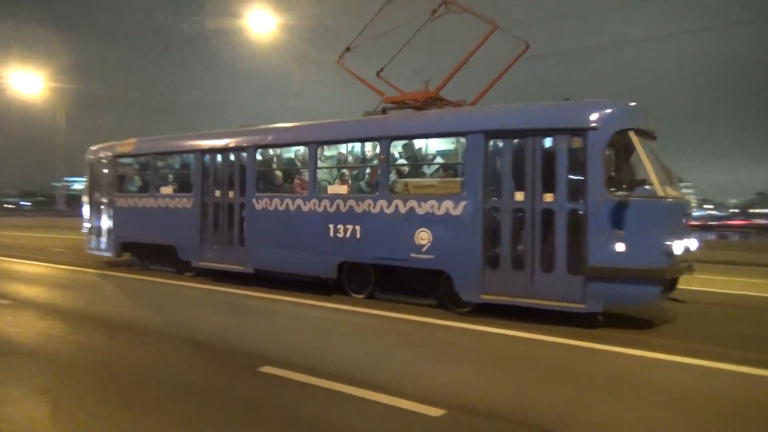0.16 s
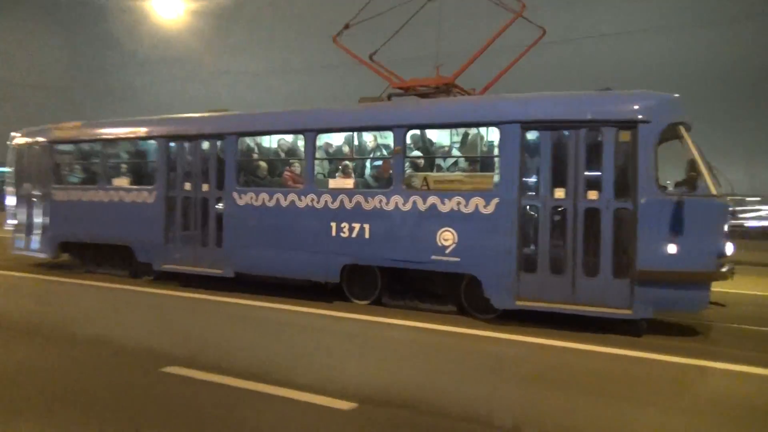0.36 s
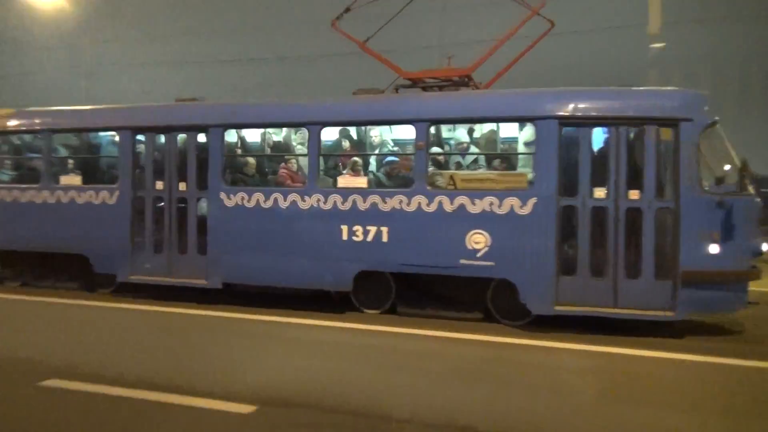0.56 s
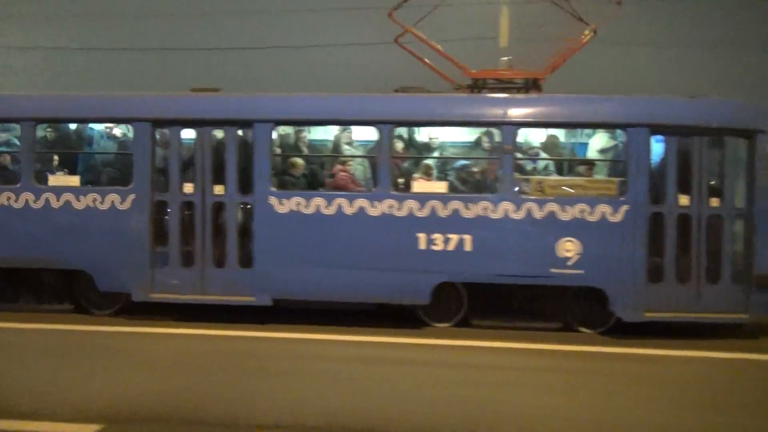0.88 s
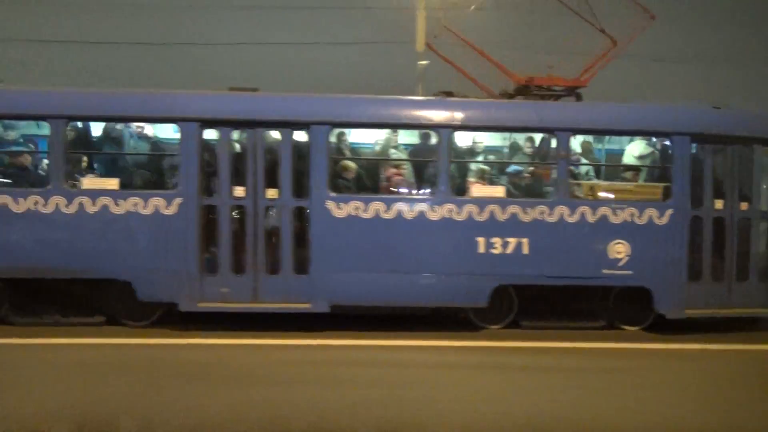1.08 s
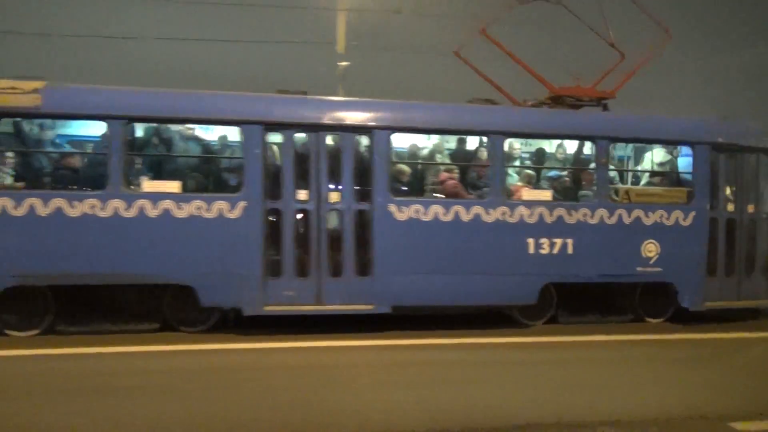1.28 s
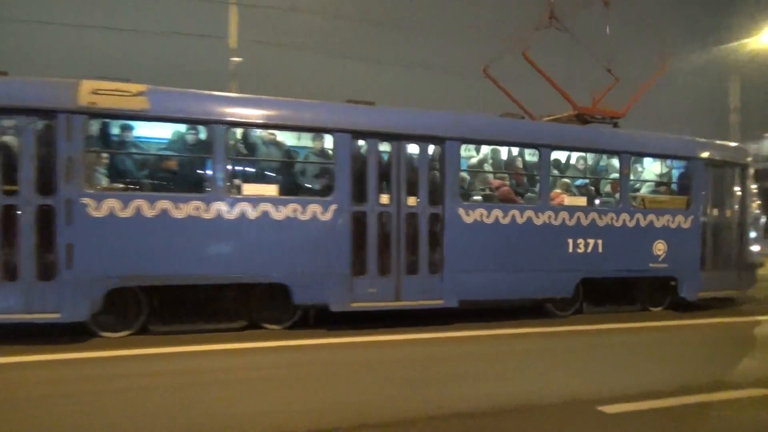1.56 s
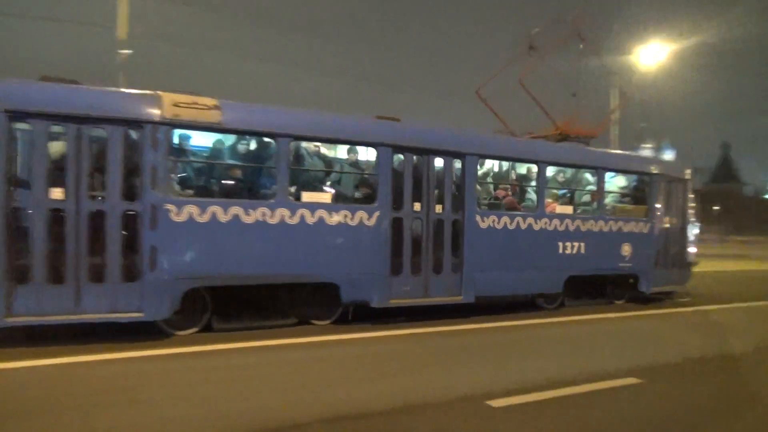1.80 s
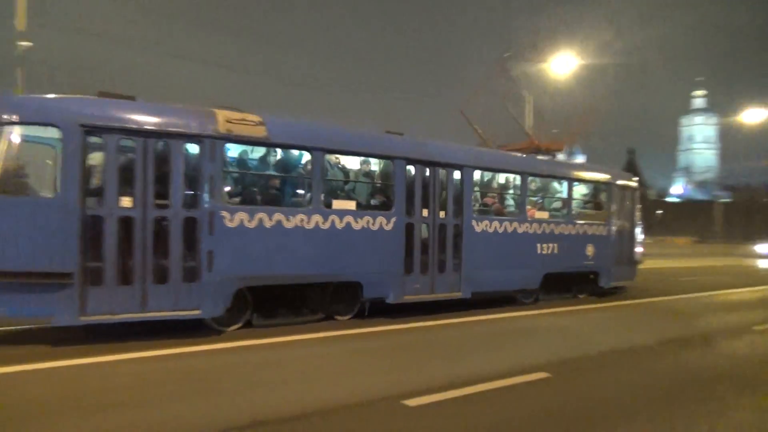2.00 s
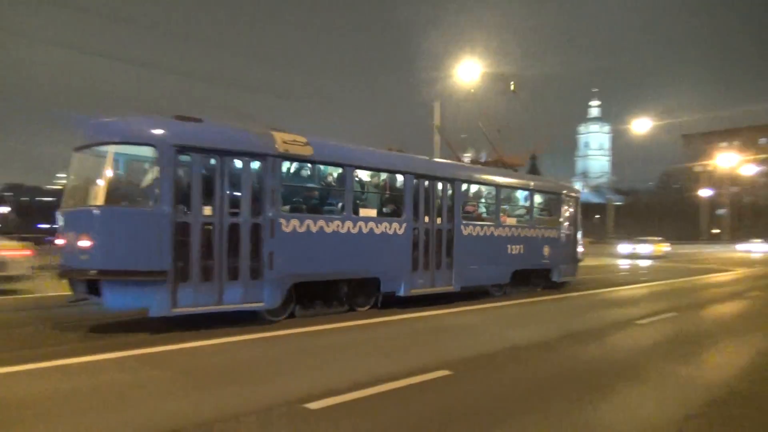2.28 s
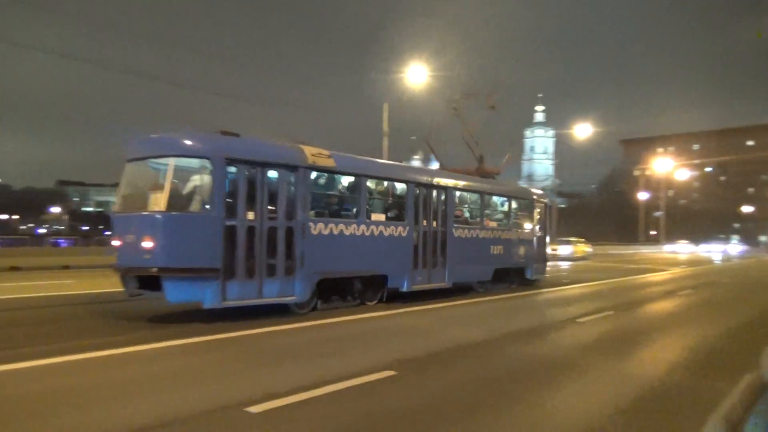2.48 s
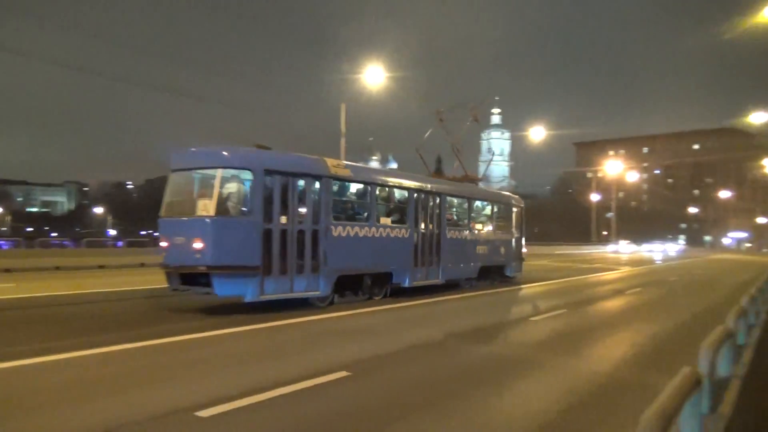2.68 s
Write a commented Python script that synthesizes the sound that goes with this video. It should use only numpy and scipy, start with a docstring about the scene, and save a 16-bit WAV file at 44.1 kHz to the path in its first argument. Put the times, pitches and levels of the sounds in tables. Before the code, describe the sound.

A tram is already close at 0 s, its body droning with an unsteady low motor hum and deep rumble. Wheels roar and clack softly under a fine sizzle, while loose metal rattles and taps. Pitch sinks fastest near 1 s. Small clinks ring at 1.6 and 2.4 s. Treble fades, traffic wash rises, and car tyres emerge left from about 2.4 s. Open roadside, stereo, peaks held down.

```python
"""A tram rolls past on a wide road at night. From the start its body drones over a hum and a deep rumble,
wheels roar and clack softly, loose metal rattles and taps close by, and traffic washes behind, rising.
Drone, hum, rumble and rolling treble sink in pitch, fastest near 1 s; a clink rings at 1.6 s, another at
2.4 s, as a car's tyres emerge on the left. Noise is shaped by spectra; hum, clinks and clack rings are
sines. The recorder's limiter holds the peaks down."""
import sys
import numpy as np
from scipy import signal
from scipy.fft import rfft, irfft, next_fast_len
from scipy.io import wavfile
from scipy.ndimage import uniform_filter1d, minimum_filter1d, map_coordinates

SR = 44100
rng = np.random.default_rng(int(sys.argv[2]) if len(sys.argv) > 2 else 0)


def transcribe(signal):
    """Save signal, clipped to [-1, 1], as a 16-bit WAV file at the path in sys.argv[1]."""
    frames = np.atleast_2d(signal).T
    limited = np.clip(frames, -1, 1)
    pcm = np.round(limited * 32767).astype(np.int16)
    wavfile.write(sys.argv[1], SR, pcm)


N = 125685


def amp(db):
    """Decibels to gain."""
    return 10 ** (np.asarray(db) / 20)


def unit(x):
    """Scaled to rms 1."""
    return x / np.sqrt(np.mean(x ** 2) + 1e-20)


def clock():
    """Time of each sample in s."""
    return np.arange(N) / SR


def curves(rows):
    """One value per sample for each column after the time."""
    s, *cols = np.transpose(rows)
    return [np.interp(clock(), s, c) for c in cols]


def wobble(knots_per_s):
    """Smooth random curve through normally distributed knots."""
    return map_coordinates(rng.standard_normal(1024), [clock() * knots_per_s], mode="wrap")


def filtered(x, response):
    """x times a response of frequency."""
    m = next_fast_len(x.shape[-1] + 8192)
    spectrum = rfft(x, m) * response(np.fft.rfftfreq(m, 1 / SR))
    return irfft(spectrum, m)[..., :x.shape[-1]]


def coloured(x, colour):
    """x through a minimum-phase filter with an (f/Hz, level/dB) spectrum, at rms 1."""
    f, db = np.transpose(colour)

    def response(hz):
        """Folding the cepstrum makes the filter causal."""
        level_db = np.interp(np.log(hz + 1), np.log(f), db)
        cepstrum = irfft(np.log(amp(level_db)))
        causal_half = 2 * cepstrum[:len(cepstrum) // 2]
        return np.exp(rfft(causal_half, len(cepstrum)) - cepstrum[0])
    return unit(filtered(x, response))


def spread(pair, side_db):
    """Two unrelated signals as middle and sides of a stereo image, at rms 1."""
    middle, side = pair[0], amp(side_db) * pair[1]
    return unit(np.array([middle + side, middle - side]))


def rush(colour, side_db):
    """Stereo noise of a given colour and width."""
    return spread(coloured(rng.standard_normal((2, N)), colour), side_db)


def pan(left_over_right_db):
    """Left and right gains for a level difference."""
    db = left_over_right_db
    return amp(np.array([db, -db]).reshape(2, -1) / 2)


def patchy(x, depth_db):
    """Narrow bands flare up and fade at random."""
    z = signal.stft(x, nperseg=1024)[2]
    field = rng.standard_normal(z.shape[1:])
    field = uniform_filter1d(field, size=3, axis=0)  # across frequency
    field = uniform_filter1d(field, size=6, axis=1)  # across time
    return unit(signal.istft(z * amp(depth_db * unit(field)), nperseg=1024)[1][:, :N])


PASS_S, GLIDE_SCALE_S = 1.05, 1.1  # closest moment, tanh time scale
DOPPLER = .09  # asymptotic pitch shift either way, as a fraction


def doppler():
    """Pitch factor of a passing source: above 1 on approach, below 1 after."""
    return 1 - DOPPLER * np.tanh((clock() - PASS_S) / GLIDE_SCALE_S)


def passing(colour, side_db):
    """Stereo noise read at the Doppler rate, so its colour glides down."""
    source = coloured(rng.standard_normal((2, 2 * N)), colour)
    position = np.cumsum(doppler())
    return spread(np.array([np.interp(position, np.arange(2 * N), s) for s in source]), side_db)


# Table levels are before each function's trim and the output gain.
# car body drone: t/s, level/dB, left over right/dB
BODY_DRONE = [(0, -19.5, -1.5), (.26, -20.5, -2), (.35, -32, 0), (.5, -21, -1), (1.0, -20, -1.5),
              (1.25, -22.5, 1.5), (1.6, -21, 3.5), (1.85, -21.5, 1), (2.2, -23.5, 1.5), (2.3, -25.5, 0.5),
              (2.58, -21, 0.5), (2.7, -23.5, 0), (2.85, -27, -0.5)]
# drone spectrum at the closest moment: f/Hz, level/dB
BODY_COLOUR = [(110, -46.5), (170, -17.5), (215, -3.5), (258, -2.5), (290, -2.5), (345, -5.5), (400, -13),
               (480, -25), (1200, -120)]


def body():
    """The shaken car body drones in one broad resonance."""
    level_db, pan_db = curves(BODY_DRONE)
    return amp(level_db + 0.38) * pan(pan_db) * passing(BODY_COLOUR, side_db=-37)


# motor hum: t/s, main tone level/dB, lower tone level/dB
MOTOR_HUM = [(0, -30, -24.5), (.25, -20.5, -41), (.4, -39, -33), (.8, -29.5, -21.5), (1.25, -19, -25),
             (1.75, -21.5, -28), (2.15, -19.5, -23), (2.4, -32.5, -38), (2.72, -24.5, -45)]
HUM_AT_PASS_HZ, LOW_TONE_RATIO = 269, .73
HUM_WANDER, HUM_FLUTTER_DB = 0.018, 2  # pitch fraction and level per unit of wobble


def motor():
    """Two sines, unsteady in pitch and level, hum inside the drone."""
    out = np.zeros(N)
    for level_db, ratio in zip(curves(MOTOR_HUM), (1, LOW_TONE_RATIO)):
        hz = HUM_AT_PASS_HZ * ratio * doppler() * (1 + HUM_WANDER * wobble(30))
        tone = np.sin(2 * np.pi * np.cumsum(hz) / SR)
        flutter = amp(HUM_FLUTTER_DB * wobble(12))
        out += amp(level_db - 4.0) * unit(flutter * tone)
    _, pan_db = curves(BODY_DRONE)
    return pan(pan_db) * out


# running gear rumble: t/s, level/dB
GEAR_RUMBLE = [(0, -22.5), (.08, -34.5), (.2, -22), (.35, -23.5), (.55, -21.5), (.85, -23), (1.0, -25),
               (1.48, -24), (1.8, -30), (1.95, -24), (2.25, -25.5), (2.6, -29), (2.85, -25.5)]
# rumble spectrum at the closest moment: f/Hz, level/dB
GEAR_COLOUR = [(20, -36.5), (45, -16.5), (68, -10.5), (88, -5.5), (112, 1), (145, 0), (185, 4.5),
               (235, -6.5), (400, -15), (1200, -120)]


def running_gear():
    """Wheels on the track give a deep rumble that sways sideways."""
    level_db, = curves(GEAR_RUMBLE)
    sway = pan(2.6 + 1.3 * wobble(5.68))
    return amp(level_db + 0.73) * sway * passing(GEAR_COLOUR, side_db=-31)


# bogie growl: t/s, level/dB
BOGIE_GROWL = [(0, -38.5), (.5, -32), (1.0, -31.5), (1.25, -46), (1.55, -37), (1.95, -47.5), (2.85, -38.5)]
# growl spectrum: f/Hz, level/dB
BOGIE_COLOUR = [(250, -35), (380, 0), (450, -9), (540, -10), (620, -20.5), (900, -60), (2000, -120)]


def bogies():
    """The bogies growl in a narrow low band, off to the right."""
    level_db, = curves(BOGIE_GROWL)
    return amp(level_db - 1.0) * pan(-8) * rush(BOGIE_COLOUR, side_db=-33)


# wheels on rails: t/s, roar level/dB, treble level/dB
WHEEL_ROLLING = [(0, -36.5, -40.5), (.27, -33, -41.5), (.38, -33, -39), (.55, -31.5, -40),
                 (.66, -32, -36.5), (1.1, -31.5, -40), (1.23, -35, -40), (1.35, -35, -40),
                 (1.53, -28.5, -39.5), (1.6, -34, -40.5), (1.9, -32, -42.5), (2.25, -35.5, -43.5),
                 (2.5, -36.5, -40), (2.7, -35.5, -45), (2.85, -36.5, -49)]
# wheel position: t/s, left over right/dB
WHEEL_PAN = [(0, -1), (1.1, -2.5), (2.85, 2)]
# roar spectrum: f/Hz, level/dB
WHEEL_ROAR_COLOUR = [(200, -13.5), (420, 0.5), (600, 4), (900, -3), (1300, 0), (1750, -5), (2300, -20),
                     (4000, -20.5), (8000, -120)]
# treble spectrum at the closest moment: f/Hz, level/dB
WHEEL_TREBLE_COLOUR = [(900, -19.5), (1650, 1.5), (2330, 2.5), (2520, -4), (3200, -3.5), (4100, -6),
                       (4700, -12.5), (9000, -68)]


def wheels():
    """Steel wheels roar unevenly on the rails, under a treble that sinks in pitch, and clack."""
    roar_db, treble_db = curves(WHEEL_ROLLING)
    pan_db, = curves(WHEEL_PAN)
    uneven_db = 0.45 * wobble(30)
    roar = patchy(rush(WHEEL_ROAR_COLOUR, side_db=-16.5), depth_db=1.5)
    treble = patchy(passing(WHEEL_TREBLE_COLOUR, side_db=-21), depth_db=2.0)
    rolling = amp(roar_db + uneven_db - 0.6) * roar + amp(treble_db + uneven_db - 2.1) * treble
    return pan(pan_db) * (rolling + clacks())


# wheel clacks: t/s, level/dB, ring f/Hz
WHEEL_CLACKS = [(0.187, -25.5, 639), (.37, -29, 1322), (.487, -24.5, 641), (0.644, -28.5, 1137),
                (.9, -32, 1128), (1.307, -27.5, 886), (1.523, -27.5, 1280), (2.132, -30.5, 1390),
                (2.436, -34, 1000), (2.764, -23.5, 700)]
# clack burst spectrum: f/Hz, level/dB
CLACK_BURST_COLOUR = [(150, -18), (400, 4), (750, -4), (950, -4.5), (1250, -1.5), (1800, -26),
                      (3200, -16.5), (5000, -30), (16000, -80)]
ATTACK_S, BURST_T60_S, RING_T60_S = .007, .1, .13
BURST_TRIM_DB, RING_TRIM_DB = 1.5, 3
RING_PHASE_KNOTS_PER_S = 130  # random phase roughens the ring


def clacks():
    """A wheel knocks over a joint: a dull burst and a brief rough ring."""
    bursts, rings = np.zeros(N), np.zeros(N)
    for s, db, hz in WHEEL_CLACKS:
        age = np.maximum(clock() - s, 0)
        struck = amp(db) * (1 - np.exp(-age / ATTACK_S))
        bursts += struck * amp(-60 * age / BURST_T60_S)
        tone = np.sin(2 * np.pi * hz * age + wobble(RING_PHASE_KNOTS_PER_S))
        rings += struck * amp(-60 * age / RING_T60_S) * tone
    burst_noise = rush(CLACK_BURST_COLOUR, side_db=-24)
    return amp(BURST_TRIM_DB) * bursts * burst_noise + amp(RING_TRIM_DB) * rings


# high hiss: t/s, level/dB
HIGH_HISS = [(0, -40), (.47, -38), (1.45, -40.5), (1.85, -44), (2.2, -41.5), (2.85, -44)]
# hiss spectrum: f/Hz, level/dB
HIGH_HISS_COLOUR = [(3000, -36), (5100, -6.5), (5600, 2), (6100, 3.5), (6500, 4.5), (7000, 0), (7800, 1),
                    (8800, -4), (10200, -4), (12500, -12.5), (14500, -20), (16000, -28)]
FLURRIES_PER_S, FLURRY_LENGTH_S, FLURRY_OVER_BED_DB = 41, .012, -10.5


def hiss():
    """A fine, restless sizzle above the roar, with scattered faint flurries."""
    level_db, = curves(HIGH_HISS)
    flutter_db = 0.54 * wobble(15) + 0.65 * wobble(70)
    bed = amp(flutter_db) * patchy(rush(HIGH_HISS_COLOUR, side_db=-15.0), depth_db=3.0)
    hits = (rng.random(N) < FLURRIES_PER_S / SR) * rng.uniform(0.15, 1, N)
    swells = signal.fftconvolve(hits, np.hanning(int(FLURRY_LENGTH_S * SR)), "same")
    flurries = unit(swells * rush(METAL_COLOUR, side_db=-18))
    return amp(level_db - 2.1) * pan(.5) * (bed + amp(FLURRY_OVER_BED_DB) * flurries)


GRAINS_PER_S = 3200


def ticks(colour, side_db):
    """A dense spray of tiny contacts of random size over faint noise, at rms 1."""
    hits = rng.random(N) < GRAINS_PER_S / SR
    grains = hits * rng.standard_normal((2, N))
    floor = 0.24 * rng.standard_normal((2, N))
    return spread(coloured(grains + floor, colour), side_db)


# metal rattles: peak t/s, level/dB, half length to 1/e power/s, lower body relative level/dB
METAL_RATTLES = [(.003, -33.5, 0.015, -9), (0.376, -38.5, 0.013, -12), (.496, -28, .012, -9.5),
                 (0.741, -34.5, 0.0068, -18), (0.797, -38.5, 0.0084, -1), (0.881, -36, 0.0065, -7),
                 (0.919, -40, 0.0091, -0.5), (1.002, -37, 0.014, -5), (1.492, -32, 0.0086, -12),
                 (1.737, -39, 0.015, -18), (2.001, -37.5, 0.013, -14), (2.15, -42, 0.0058, 1),
                 (2.238, -43, 0.032, -9), (2.373, -41.5, 0.014, -5), (2.494, -35.5, .013, -11),
                 (2.739, -38.5, 0.017, -8), (2.786, -39, 0.011, -2.5)]
# small contacts spectrum: f/Hz, level/dB
METAL_COLOUR = [(2000, -44), (4000, -6.5), (5100, -6), (5700, 3), (6500, 7.5), (7800, 4.5), (8900, 0),
                (10000, 0.5), (13000, -4), (16000, -18)]
# lower body spectrum: f/Hz, level/dB
METAL_BODY_COLOUR = [(900, -32), (1900, 5.5), (2700, -5), (4000, -5.5), (5200, -9), (9000, -53)]


def rattles():
    """Flurries of small metal contacts swell and die, each shaking the lower body too."""
    top_power, low_power = np.zeros(N), np.zeros(N)
    for s, db, half_s, body_db in METAL_RATTLES:
        swell = np.exp(-((clock() - s) / half_s) ** 2)
        top_power += amp(db) ** 2 * swell
        low_power += amp(db + body_db) ** 2 * swell
    top = np.sqrt(top_power) * ticks(METAL_COLOUR, side_db=-19)
    return top + np.sqrt(low_power) * ticks(METAL_BODY_COLOUR, side_db=-22)


# sharp taps of the loose metal: t/s, level/dB
METAL_TAPS = [(0.2253, -36), (.4794, -32), (.5891, -37), (0.784, -37), (1.528, -35), (2.8197, -34.5)]
# tap spectrum: f/Hz, level/dB
METAL_TAP_COLOUR = [(1500, -22), (3500, 3), (5000, 4), (6500, 7), (9000, 0.5), (14000, -10), (16000, -22)]
TAP_T60_S = 0.065


def taps():
    """Single contacts start abruptly and die fast."""
    blows = np.zeros(N)
    for s, db in METAL_TAPS:
        age = np.maximum(clock() - s, 0)
        blows += (clock() >= s) * amp(db - 60 * age / TAP_T60_S)
    return blows * rush(METAL_TAP_COLOUR, side_db=-25)


# clinks: t/s, level/dB, f/Hz
METAL_CLINKS = [(1.554, -27, 8170), (2.4364, -32.5, 3550)]
# modes of the clinking metal: multiple of the pitch, level/dB, t60/s
METAL_MODES = [(.777, -9, .047), (1, -1, 0.041), (1.44, -13, .05)]


def clinks():
    """A small piece of metal is struck and rings briefly in a few decaying modes."""
    out = np.zeros(N)
    for s, db, hz in METAL_CLINKS:
        age = np.maximum(clock() - s, 0)
        attack = 1 - np.exp(-age / 0.00061)
        for ratio, mode_db, t60_s in METAL_MODES:
            level_db = db + mode_db + rng.normal(0, 1)
            decay = amp(level_db - 60 * age / t60_s)
            out += decay * np.sin(2 * np.pi * hz * ratio * age) * attack
    return out


# tyres of a car, uncovered as the tram clears it: t/s, level/dB
CAR_TYRES = [(0, -55), (1.4, -49), (2.25, -43.5), (2.45, -35), (2.85, -35.5)]
# tyre spectrum: f/Hz, level/dB
TYRE_COLOUR = [(350, -60), (560, -6), (720, 2), (950, -2.5), (1250, -4), (1600, -24), (8000, -81)]


def car():
    """Tyre noise of one nearer car on the left."""
    level_db, = curves(CAR_TYRES)
    tyres = patchy(rush(TYRE_COLOUR, side_db=-27), depth_db=1.5)
    return amp(level_db - 3.5) * pan(11.3) * tyres


# road wash spectrum: f/Hz, level/dB
ROAD_COLOUR = [(25, -24), (90, 8), (250, -3), (500, -0.5), (800, -0.5), (1200, -10.5), (2500, -14.5),
               (8000, -23.5), (16000, -93)]
ROAD_START_DB, ROAD_RISE_DB_PER_S = -41, 2.5


def traffic():
    """The smooth, slowly rising noise wash of the road."""
    return amp(ROAD_START_DB + ROAD_RISE_DB_PER_S * clock()) * rush(ROAD_COLOUR, side_db=-25)


def scene():
    """Everything heard at the roadside."""
    tram = body() + motor() + running_gear() + bogies() + wheels() + hiss()
    loose_metal = rattles() + taps() + clinks()
    return tram + loose_metal + car() + traffic()


LIMIT_BEFORE_GAIN_DB, OUTPUT_GAIN_DB = -9.5, 0.77
LIMIT_HOLD_S, TOP_HZ = 0.023, 16300


def record(dry):
    """A smoothed peak limiter, linked across channels, then gain and a band limit."""
    hold = max(int(LIMIT_HOLD_S * SR), 8)
    peak = np.abs(dry).max(axis=0)
    needed = np.minimum(1, amp(LIMIT_BEFORE_GAIN_DB) / (peak + 1e-9))
    gain = uniform_filter1d(minimum_filter1d(needed, hold), hold)
    return filtered(amp(OUTPUT_GAIN_DB) * dry * gain, lambda hz: hz < TOP_HZ)


dry = scene()
out = record(dry)
transcribe(out)
```